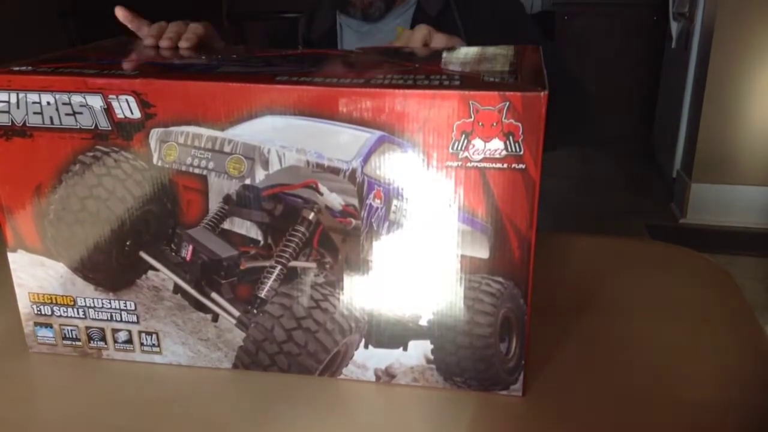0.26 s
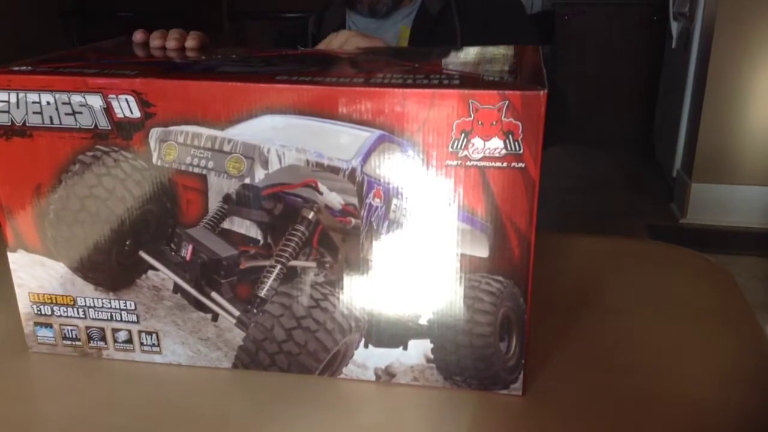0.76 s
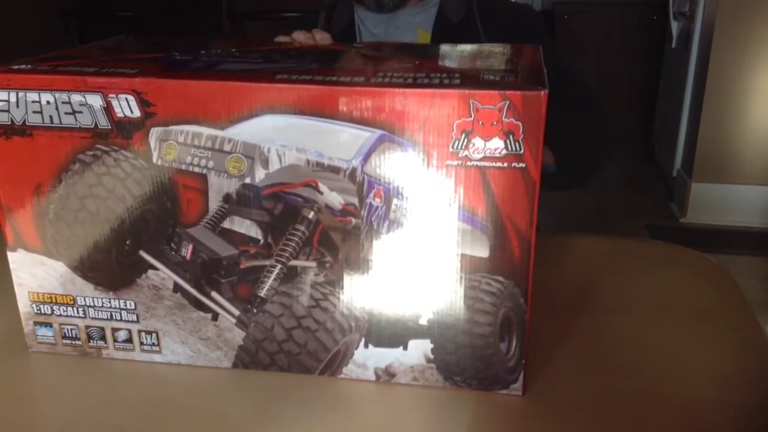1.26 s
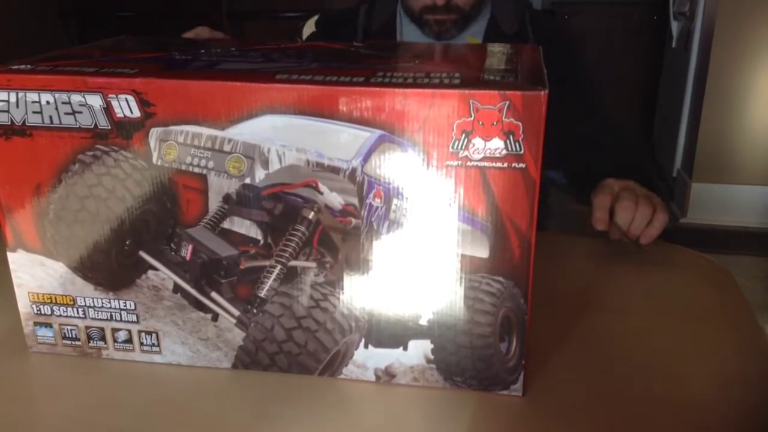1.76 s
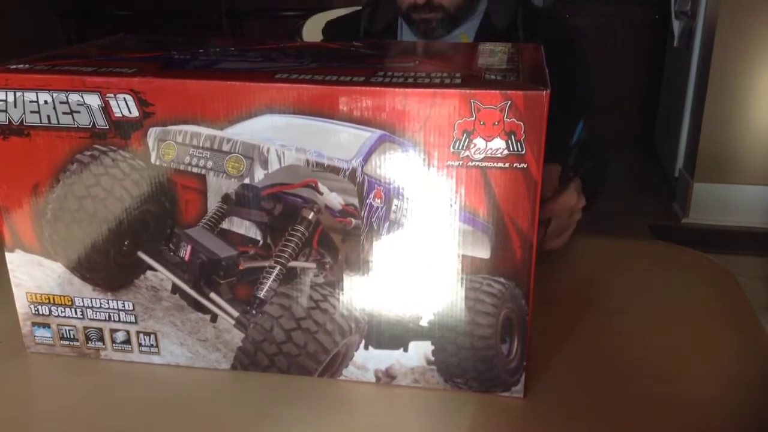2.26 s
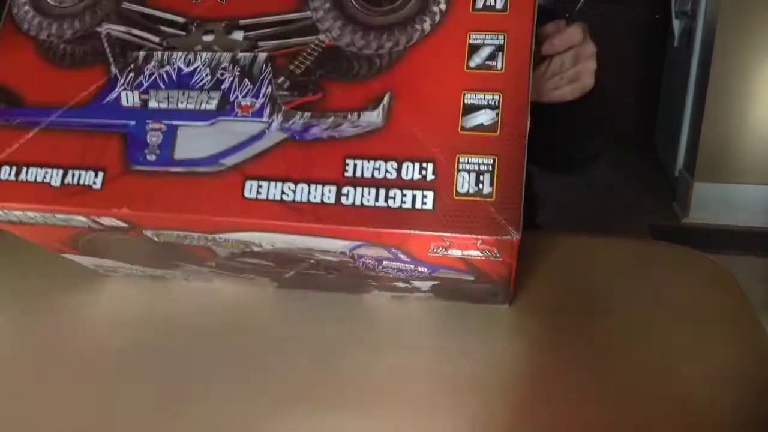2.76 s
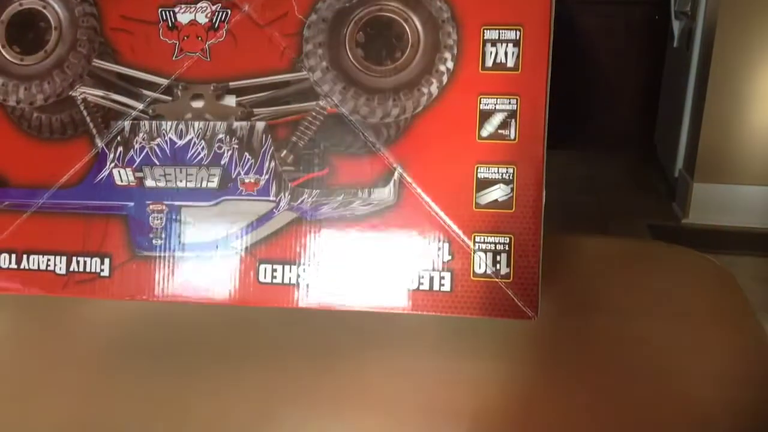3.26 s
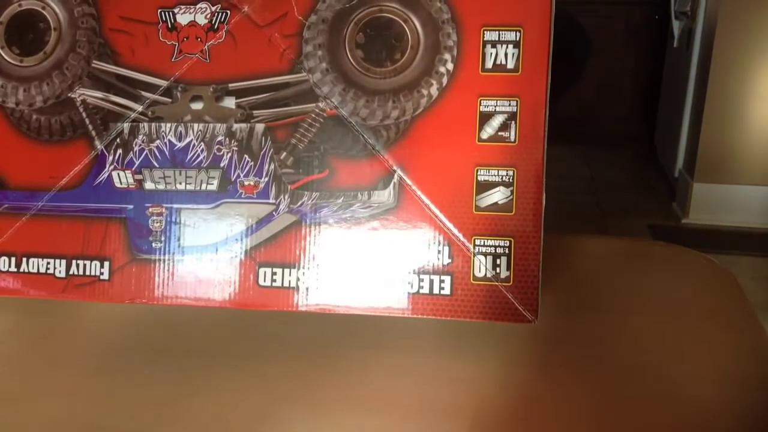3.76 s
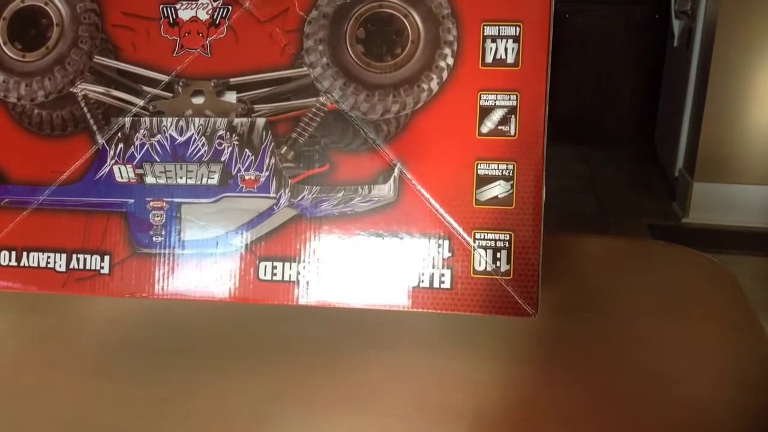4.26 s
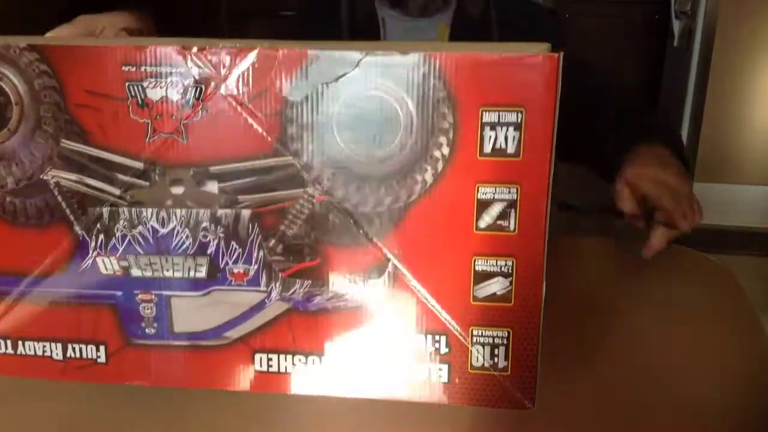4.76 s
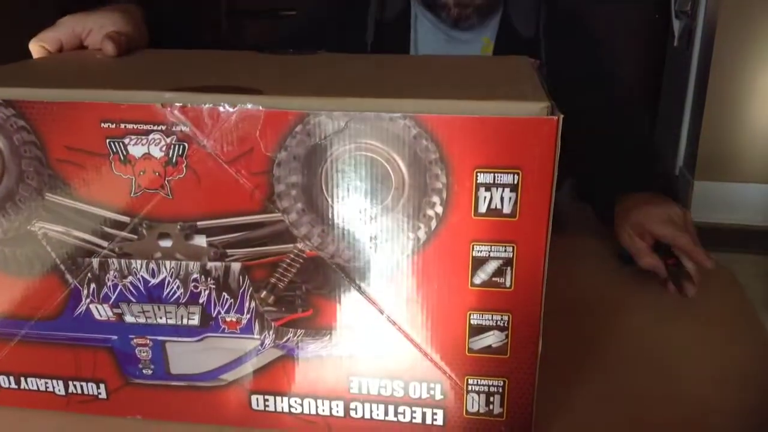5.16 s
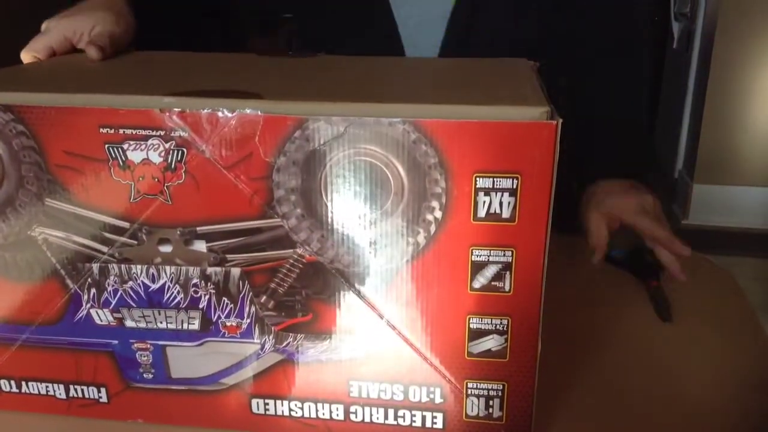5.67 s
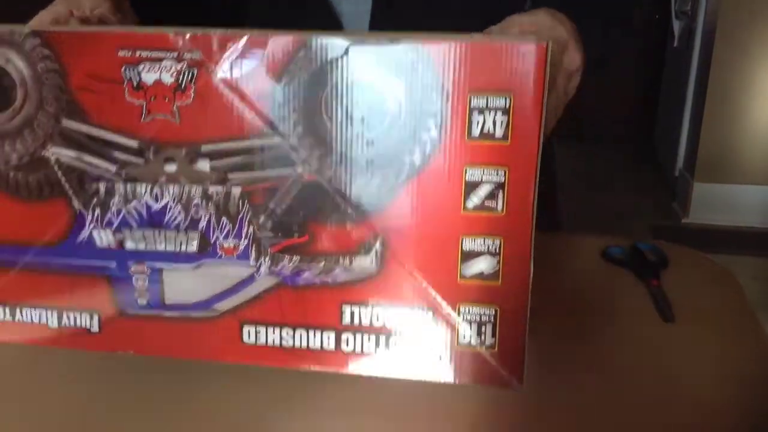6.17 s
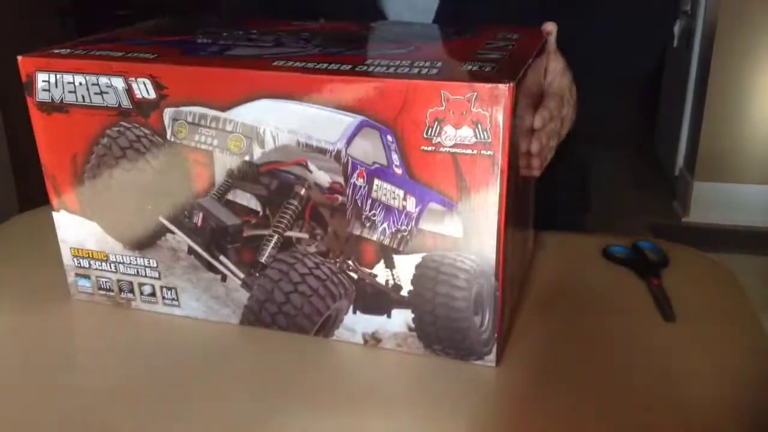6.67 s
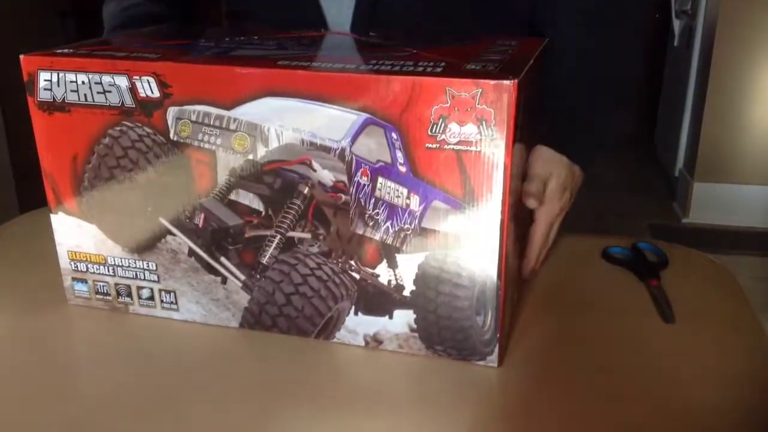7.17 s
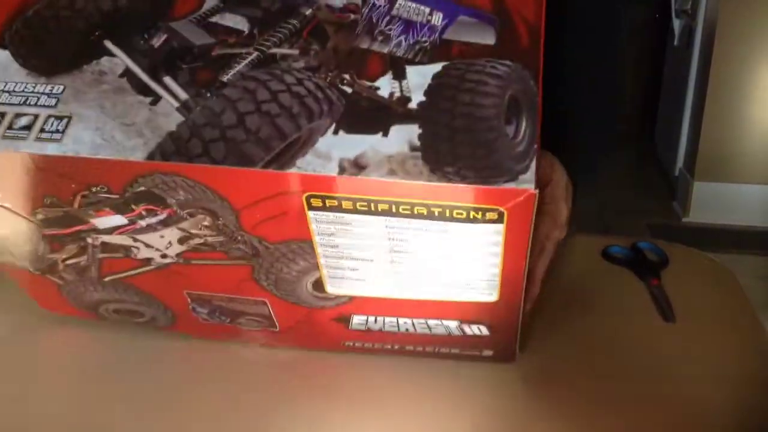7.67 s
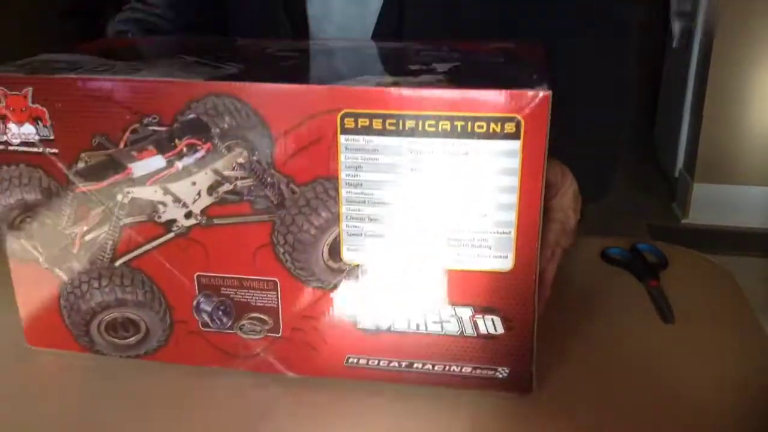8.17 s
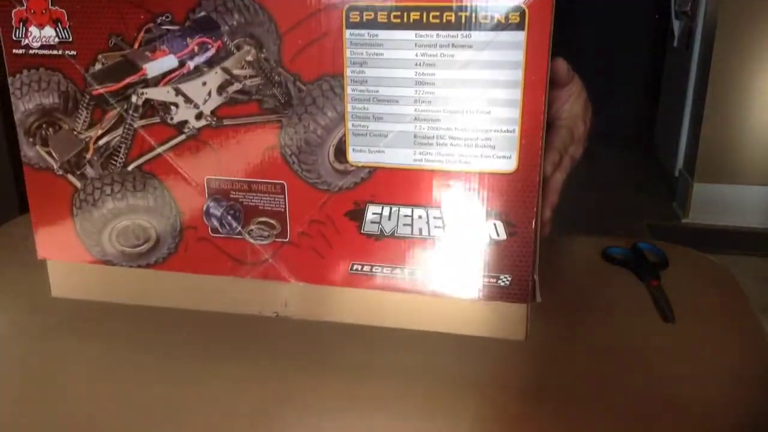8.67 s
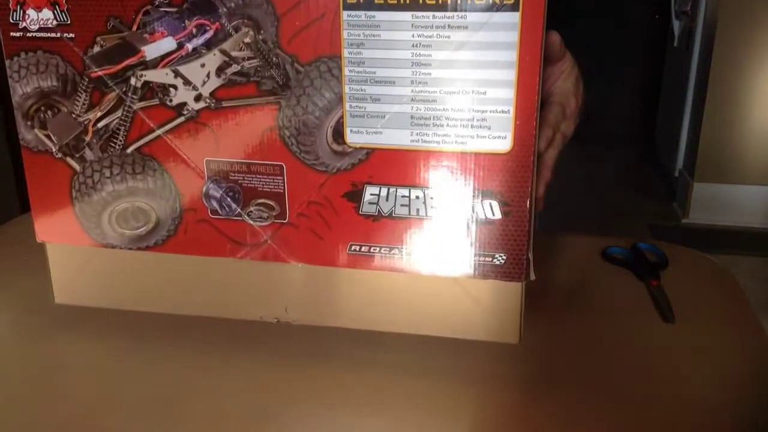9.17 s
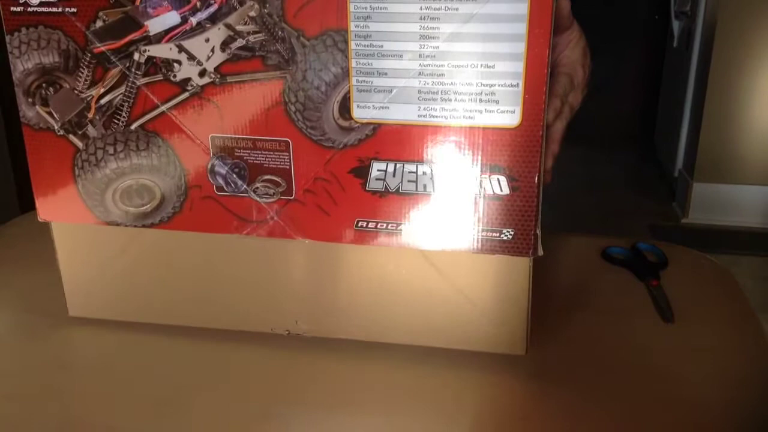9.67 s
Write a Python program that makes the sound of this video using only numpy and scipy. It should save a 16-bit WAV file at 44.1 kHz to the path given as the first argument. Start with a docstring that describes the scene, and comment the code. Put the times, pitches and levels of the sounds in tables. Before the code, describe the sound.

A faint steady hum and hiss lies under everything, in a small hard room, picked up close. From 0 to 2 s hands brush a large cardboard box, with dull light taps, a bright swish at 0.6 and a dry tick. From 2.1 to 4.7 s the box is turned with low rubs and soft hollow bumps, a clearer one near 4.0. At 4.9 a small tool snaps shut, by far sharp and loud; small taps at 5.2 to 5.5 grow into a rapid clatter on wood from 5.6 to 5.9. Thuds at 6.0 and 6.2 begin more tipping, with swishes and knocks until 7.5. Around 7.75 bright crackles burst with a rub, then a firm hollow thump lands at 8.17. From 8.3 to the end the lid drags upward in steady, uneven scraping, catching briefly near 8.6, with a soft bump at 9.8.

```python
"""Over faint hum and hiss, hands slide over a large cardboard box on a wooden table: stick-slip drives its walls.
Midway a small folding tool snaps shut, is shuffled about and dropped; its impacts ring tool and table modes.
Then the box is tipped and set down, its walls ringing at each blow, and its lid is dragged up by friction.
Tape and card edges crackle along the way; a small hard room reflects every blow and crackle."""
import sys
import numpy as np
from scipy import signal
from scipy.fft import rfft, irfft
from scipy.io import wavfile

SR = 44100
rng = np.random.default_rng(int(sys.argv[2]) if len(sys.argv) > 2 else 0)


def wav_out(sig):
    """Save sig, one row per channel (or a flat mono array), as 16-bit PCM at SR to the path in sys.argv[1]."""
    wavfile.write(sys.argv[1], SR, np.round(np.clip(np.atleast_2d(sig).T, -1, 1) * 32767).astype(np.int16))


N = 437472  # samples

# Spectrum of the steady background noise. Each row: frequency in Hz, relative density in dB per Hz.
FLOOR_SPECTRUM = [(24, -58), (40, -28), (75, -47), (104, -31), (124, 2), (140, -4), (226, 1), (467, -4),
                  (2050, -16.5), (9940, -19.5), (10700, -19.5), (16000, -25)]
# Decay of the room. Each row: frequency in Hz, t60 in s.
ROOM_DECAY = [(150, 0.2), (500, 0.41), (1500, 0.46), (4000, 0.46), (9000, 0.39), (15000, 0.34)]
# Dry crackles of tape and card edges. Each row: start in s, peak in dB, pitch in Hz.
TICKS = [(0.15, -43, 2960), (0.555, -43, 3420), (0.5804, -25.5, 3130), (1.368, -45, 3940),
         (1.6472, -31, 11800), (2.275, -42, 1910), (2.486, -39, 2520), (4.2447, -31.5, 2040),
         (4.4197, -44, 2160), (4.659, -41, 2880), (5.16, -47, 12000), (5.1754, -29.5, 8980),
         (5.293, -44, 12100), (6.5382, -33, 3770), (6.813, -40, 2350), (7.393, -44, 2800),
         (7.418, -34, 1820), (7.7388, -27, 3050), (7.762, -19.5, 6030), (7.7748, -24, 5270),
         (7.8232, -30.5, 4200), (7.8564, -33, 7220), (7.7376, -28, 7000), (7.7626, -18, 12000),
         (7.8817, -24, 7450), (8.0235, -30.5, 2960), (8.1038, -32, 2700), (8.2665, -36, 2540)]
# The tool snaps shut. Each row: start in s, peak of the ring in dB, peak of the sharp crack in dB.
SNAPS = [(4.930, -6.5, -18)]
# The tool taps and bounces. Each row: start in s, clack in dB, its pitch in Hz, its focus in dB per octave,
# knock of the table in dB, its pitch in Hz, sharp crack in dB.
KNOCKS = [(5.2039, -26.5, 3610, 6, -31.5, 1600, -52), (5.3646, -36, 3460, 19, -47, 420, -34),
          (5.4938, -26, 3640, 13, -25, 1570, -47), (5.5798, -15.5, 2940, 14, -25, 1450, -26.5),
          (5.602, -20.5, 3360, 23, -28.5, 1310, -37), (5.652, -14.5, 4460, 3, -11, 1450, -17),
          (5.6542, -15, 2900, -6.5, -10, 530, -8), (5.724, -9, 2350, 2, -13, 880, -32),
          (5.7787, -17, 2160, 8, -11, 890, -40), (5.8108, -16, 3350, 5, -17.5, 1760, -35),
          (5.8347, -23, 2700, 13, -21.5, 840, -36), (5.8606, -30, 2200, 3, -21.5, 830, -37)]
# Modes of the free tool. Each row: frequency in Hz, level in dB, t60 in s.
TOOL_MODES = [(505, -8, 0.024), (1026, -3, 0.021), (1507, 1.5, 0.02), (2057, 1, 0.013), (2500, 3, 0.022),
              (2960, 1, 0.015), (3473, 11, 0.0059), (3980, -6, 0.02), (4560, 3, 0.0065), (4910, 1, 0.0086),
              (5460, 1, 0.0065), (6200, -2, 0.0055), (9100, -12, 0.0018)]
# Modes of the table top. Each row: frequency in Hz, level in dB, t60 in s.
TABLE_MODES = [(242, -41, 0.11), (308, -4.5, 0.41), (386, -45, 0.036), (523, 14, 0.04), (583, -1, 0.14),
               (663, 3.5, 0.052), (830, 5.5, 0.028), (932, 14, 0.019), (1398, 17, 0.011),
               (1480, 5.5, 0.035), (1720, 19.5, 0.012), (2233, 18.5, 0.01)]
# Hard edges meeting. Each row: frequency in Hz, relative level in dB.
CRACK_SPECTRUM = [(1000, -11), (3000, 3.5), (8000, -2.5), (12000, -7.5), (16000, -17)]
# Blows on the box. Each row: start in s, peak in dB, pitch of the struck wall in Hz,
# hardness in dB per octave, slap in dB.
THUMPS = [(0.065, -33, 202, 0, -55), (0.333, -36.5, 370, 12, -55), (0.574, -35, 1060, -7, -52),
          (0.748, -33.5, 247, 14.5, -53.5), (1.366, -35.5, 225, 5, -44), (1.747, -34, 245, 2, -53),
          (2.125, -28.5, 245, 3, -41), (2.233, -42, 159, -4, -58), (2.270, -45, 200, 5, -53),
          (2.545, -43, 237, -11, -60), (2.697, -30, 301, 3, -57), (3.016, -32.5, 346, 8, -49),
          (3.674, -35, 360, -1, -53), (3.958, -24, 331, 10, -44), (4.273, -55, 377, 7, -50),
          (4.513, -48, 216, -13, -60), (4.849, -43, 870, 1, -54), (5.983, -23.5, 177, -11.5, -39),
          (6.227, -29, 292, 6, -38), (6.236, -17.5, 312, 7, -29), (6.246, -21.5, 463, -4, -55),
          (6.427, -33, 390, 12, -54), (6.72, -35, 431, 9, -57), (6.779, -28, 1040, -7, -55),
          (6.806, -30, 404, -7, -36.5), (6.876, -36, 148, -22, -60), (6.923, -37.5, 1030, 0, -46),
          (7.035, -37, 129, 7.5, -58), (7.132, -33.5, 430, -10, -58), (7.367, -39, 1030, 5, -43),
          (7.415, -28, 382, 13, -34), (7.689, -33, 250, 5, -55), (7.696, -21.5, 221, 7.5, -48),
          (7.709, -33, 213, 5, -55), (7.753, -26, 156, 7, -47), (8.162, -29, 252, 10, -36),
          (8.169, -15, 222, 0.5, -34), (8.188, -18, 242, 6.5, -38), (8.198, -19.5, 231, 4, -44),
          (8.226, -25, 231, 0, -54), (9.818, -31.5, 178, -1.5, -55)]
# Modes of the box, before any extra damping. Each row: frequency in Hz, level in dB, t60 in s.
BOX_MODES = [(93, -13.5, 0.13), (137, -34, 0.011), (181, -22, 0.034), (198.4, -3, 0.051),
             (236.6, -1, 0.078), (292.6, 0.5, 0.031), (373, 2, 0.034), (454, -0.5, 0.048), (511, 10, 0.017),
             (665, 14.5, 0.01), (876, 6.5, 0.019), (1007, 3.5, 0.037), (1176, -19, 0.08), (1358, -1, 0.021),
             (1880, -28, 0.0057), (2520, 6, 0.011), (3520, -10, 0.0041)]
# Card meeting card or wood. Each row: frequency in Hz, relative level in dB.
SLAP_SPECTRUM = [(400, -6), (1200, 0), (3500, -7), (7000, -16), (16000, -24)]
# Strokes of hands and card. Each row: time of the peak in s, rise in s, fall in s, drone of the box walls in dB,
# its pitch in Hz, slide on the table in dB, scrape of card in dB, swish of skin on the glossy print in dB.
STROKES = [ (.074, 0.092, 0.1, -48, 206, -49.5, -50, -50), (.15, 0.092, 0.13, -49, 230, -55, -52.5, -55.5),
           (.36, 0.17, .2, -50.5, 370, -56, -71, -58), (.49, .25, 0.6, -48.5, 338, -50, -47.5, -54.5),
           (.6, 0.047, 0.075, -45.5, 326, -45, -40.5, -36.5),
           (.794, 0.069, 0.088, -36.5, 276, -43, -44.5, -43),
           (1.058, 0.08, 0.066, -54.5, 246, -74, -58, -53.5), (1.39, 0.073, 0.1, -55, 250, -62, -63, -59),
           (1.46, 0.22, 0.13, -51.5, 266, -55.5, -59, -79), (1.6, 0.19, 0.23, -55.5, 371, -59, -58, -52),
           (1.78, 0.15, 0.12, -47, 295, -50, -48, -40.5), (2.16, 0.042, .2, -46, 267, -55, -56.5, -58.5),
           (2.27, 0.12, 0.1, -43, 210, -59, -58.5, -62), (2.446, 0.17, 0.96, -53, 332, -55, -55, -53),
           (2.684, 0.18, 0.48, -41.5, 302, -52, -52.5, -56.5),
           (2.806, .2, 0.14, -47.5, 257, -52, -54.5, -56), (3.0, 0.06, 0.27, -45.5, 264, -53.5, -56.5, -68),
           (3.122, 0.29, 0.1, -49.5, 260, -52.5, -55, -55.5), (3.224, .1, 0.14, -54, 432, -57.5, -64, -64),
           (3.35, 0.17, 0.9, -63, 240, -75, -70, -73), (3.786, 0.085, 0.11, -49.5, 408, -52, -57, -62),
           (3.835, 0.14, 0.075, -46, 364, -47.5, -55, -54.5), (3.99, 0.29, 0.14, -54, 390, -68, -62, -65),
           (4.13, 0.58, .2, -50.5, 383, -52.5, -66, -66), (4.222, 0.054, 0.13, -48, 407, -43, -52, -61),
           (4.274, 0.048, 0.083, -40, 288, -46.5, -45.5, -42),
           (4.53, 0.84, 0.38, -61, 266, -65, -65.5, -69), (4.662, .06, 0.22, -58, 293, -60, -60.5, -80),
           (4.91, .1, .1, -66, 320, -72, -67, -66), (5.12, 0.29, 0.081, -43, 407, -49, -63, -66),
           (5.18, 0.018, 0.19, -48, 377, -70, -58, -59), (5.299, 0.37, 0.11, -51, 259, -60, -57, -70),
           (5.389, 0.077, 0.14, -48, 248, -48.5, -51.5, -73), (5.93, 0.6, .06, -43, 282, -46.5, -53, -57),
           (6.0, 0.054, 0.11, -40, 220, -46, -50, -49), (6.1, 0.15, .15, -49, 230, -50.5, -50.5, -51),
           (6.2, .1, 0.089, -54, 230, -53, -56, -61), (6.29, 0.061, 0.11, -40, 455, -65, -50.5, -82),
           (6.4, 0.064, 0.25, -62, 424, -67, -54.5, -46), (6.468, .15, 0.26, -39.5, 264, -45.5, -49.5, -47),
           (6.57, .1, 0.12, -39.5, 295, -47, -46, -43), (6.712, 0.036, 0.24, -46, 405, -62, -53, -50.5),
           (6.815, 0.092, .06, -49, 383, -48.5, -52.5, -52), (6.9, 0.2, 0.16, -50, 252, -61, -64, -71),
           (6.984, 0.12, 0.22, -55, 344, -57.5, -59, -58), (7.16, .07, 0.18, -45.5, 205, -58, -56, -58),
           (7.385, 0.24, 0.13, -50.5, 405, -54.5, -58, -67), (7.43, 0.07, 0.065, -61, 320, -54, -50, -45),
           (7.485, 0.089, 0.097, -46, 270, -49, -45.5, -44), (7.536, .15, 0.073, -43.5, 236, -53, -54, -61),
           (7.652, 0.35, 0.13, -50.5, 394, -54, -56.5, -59.5),
           (7.739, 0.019, 0.045, -47, 235, -49, -46, -57), (7.774, 0.046, 0.032, -32, 223, -39, -43.5, -39),
           (7.82, 0.071, 0.3, -46.5, 210, -49.5, -49, -48.5),
           (8.036, 0.22, 0.53, -48.5, 307, -55.5, -49, -50.5), (8.13, .2, 0.12, -65, 234, -59, -48, -73),
           (8.32, 0.15, 0.19, -40, 219, -45, -43.5, -47), (8.55, 0.09, 0.042, -49, 260, -55, -51.5, -56),
           (8.715, .09, 0.094, -47, 240, -49, -48.5, -49.5), (8.86, .1, 0.17, -50, 330, -52, -52, -53.5),
           (8.99, 0.11, 0.13, -51, 260, -49, -52, -54), (9.19, 0.11, .1, -52, 260, -56, -56, -56),
           (9.38, .12, 0.24, -46, 288, -46, -49, -52), (9.6, 0.17, 0.39, -50.5, 241, -47.5, -51, -56),
           (9.75, 0.36, 0.17, -53, 360, -50, -49, -49.5), (9.82, .1, 0.072, -41, 185, -50, -44, -47), ]
# The lid drags up the sides. One row: drone in dB, its pitch in Hz, slide in dB, scrape in dB, swish in dB.
LID = (-50, 285, -51.5, -55.5, -61)
# How hard the lid drags; it sticks once, a brief dip. Each row: time in s, gain on the lid's levels in dB.
LID_DRAG = [(8.2, -29), (8.3, -0.5), (8.58, 1.5), (8.63, -4.5), (8.68, 0.5), (9.0, 1), (9.3, 0.5),
            (9.6, -1), (9.92, 2)]
# Card sliding on the table top. Each row: frequency in Hz, filter gain in dB.
SLIDE_SPECTRUM = [(400, -33), (650, -2.5), (850, 0.5), (1050, -2.5), (1300, -2), (1550, 0.5), (2200, -17),
                  (4000, -55)]
# Scrape of card. Each row: frequency in Hz, relative density in dB per Hz.
SCRAPE_SPECTRUM = [(900, -31), (1700, -4.5), (2200, -5), (3300, -4.5), (4500, -10.5), (6500, -16),
                   (9000, -15), (16000, -78)]
# Swish of skin on the print. Each row: frequency in Hz, relative density in dB per Hz.
SWISH_SPECTRUM = [(3000, -15), (5500, -1), (7500, -3), (9500, -0.5), (13500, -0.5), (15900, -4.5),
                  (16400, -51)]
# Thinner swish of a light palm. Each row: frequency in Hz, relative density in dB per Hz.
GLIDE_SPECTRUM = [(5000, -40), (8500, -7), (10500, 1), (14500, -1.5), (15900, -3), (16400, -40)]

FLOOR_DB, HUM_DB, HUM_HZ = -61, -73.5, 120  # rms levels ahead of the microphone
SLAP_DECAY_S, CRACK_DECAY_S = 0.025, 0.01
SWELL_DB = 20  # a stroke gains this much over its rise and loses it over its fall
SWELL_ROUNDING = 1.11  # above 1 the top of a swell is rounded
GLIDE_START_DB, GLIDE_SPAN_DB = 5, 4  # swish over scrape where gliding starts; further rise until it is full


def gain_of(db):
    """Level law: decibels to an amplitude factor."""
    return 10 ** (np.asarray(db) / 20)


def evened(x):
    """Power normalization: scales to rms 1."""
    return x / np.sqrt(np.mean(x ** 2) + 1e-20)


def peaked(x):
    """Amplitude normalization: scales to peak 1."""
    return x / abs(x).max()


def read(points, hz):
    """Interpolation of a table on a log-frequency axis."""
    f, value = np.transpose(points)
    return np.interp(np.log(hz + 1), np.log(f + 1), value)


def add(mix, s, sound):
    """Superposition: mixes a sound in at time s."""
    part = mix[round(s * SR):][:len(sound)]
    part += sound[:len(part)]


def colour(x, points):
    """Linear filtering by a spectrum, scaled to rms 1."""
    gain = gain_of(read(points, np.fft.rfftfreq(len(x), 1 / SR)))
    return evened(irfft(rfft(x) * gain, len(x)))


def ring(modes, strike_db=0, damping=1, contact_s=0.0006):
    """Modal superposition: dying sines, with an onset softened by the contact time.

    strike_db is how much the struck place favours each mode; damping divides every t60.
    """
    hz, db, t60 = np.transpose(modes)[:, :, None]
    t = np.arange(SR // 8) / SR
    decay = gain_of(db + strike_db - 60 * damping * t / t60)
    modal = decay * np.sin(2 * np.pi * hz * t)
    return modal.sum(0) * (1 - np.exp(-t / contact_s))


def favour(modes, hz, db_per_octave):
    """Modal participation: the struck place rings the modes near hz best."""
    return -db_per_octave * abs(np.log2(np.array(modes)[:, :1] / hz))


def burst(points, decay_s):
    """Broadband impact: a short dying puff of noise with a smooth spectrum, peak 1."""
    t = np.arange(4096) / SR
    z = rfft(rng.standard_normal(len(t)) * gain_of(-60 * t / decay_s))
    spectrum = gain_of(read(points, np.fft.rfftfreq(len(t), 1 / SR)))
    puff = irfft(z / abs(z) * spectrum)  # keeps the phases, smooths the magnitudes
    return peaked(puff * gain_of(-30 * t / decay_s))


def slips(per_s, spread_db):
    """Stick-slip friction: random clicks of random sign; spread_db sets how their sizes scatter."""
    size = gain_of(spread_db * np.minimum(rng.exponential(1, N), 4))
    struck = rng.random(N) < per_s / SR
    return evened(size * struck * rng.choice([-1, 1], N))


def resonate(x, hz, width):
    """Heterodyne resonance: shifts the curve hz down to zero, smooths, and shifts back, gain 1."""
    turn = np.exp(2j * np.pi * np.cumsum(hz) / SR)
    r = np.exp(-np.pi * width / SR)
    return 2 * (turn * signal.lfilter([1 - r], [1, -r], x / turn)).real


def background():
    """Stationary noise: hiss and rumble of fixed spectrum, with a mains hum as one sine."""
    hum = np.sqrt(2) * np.sin(2 * np.pi * HUM_HZ * np.arange(N) / SR)
    noise = colour(rng.standard_normal(N), FLOOR_SPECTRUM)
    return gain_of(FLOOR_DB) * noise + gain_of(HUM_DB) * hum


def room(x):
    """Reverberation: sparse reflections of random sign from 3 ms on, decaying by frequency."""
    taps = np.zeros((3, SR // 2 + 20))
    grid = np.arange(130, SR // 2, 20)
    at = grid + rng.integers(0, 20, (3, len(grid)))
    np.put_along_axis(taps, at, rng.choice([-1., 1.], at.shape), 1)
    hz, t, z = signal.stft(taps, SR, nperseg=256)
    early = 1 + 1.66 * np.exp(-t / 0.026)  # table and near wall answer first and strongest
    decay = gain_of(-60 * t / read(ROOM_DECAY, hz)[:, None])
    tails = signal.istft(z * early * decay, SR, nperseg=256)[1]
    # three tails take turns, 3 rounds a second, so that blows differ
    phase = np.arange(N) / SR * 3 + np.arange(3)[:, None] / 3
    turn = np.sqrt(2 / 3) * np.cos(2 * np.pi * phase)
    return signal.fftconvolve(x * turn, tails / np.linalg.norm(tails[0]), axes=1)[:, :N].sum(0)


def ticks():
    """Strongly damped oscillation: a few cycles at the pitch of each crackle."""
    out, t = np.zeros(N), np.arange(300) / SR
    for s, db, hz in TICKS:
        crackle = np.sin(2 * np.pi * hz * t) * np.exp(-t * hz / 2.4)
        add(out, s, gain_of(db) * peaked(crackle))
    return out


def knocks():
    """Impact of coupled bodies: the snap rings the free tool; taps and bounces clack, knock the table and crack."""
    out = np.zeros(N)
    for s, db, crack_db in SNAPS:
        add(out, s, gain_of(crack_db) * burst(CRACK_SPECTRUM, CRACK_DECAY_S))
        add(out, s, gain_of(db) * peaked(ring(TOOL_MODES, contact_s=0.0004)))
    place = rng.standard_normal((len(KNOCKS), len(TABLE_MODES), 1))
    main_hz = max(TOOL_MODES, key=lambda mode: mode[1])[0]
    for (s, clack_db, hz, focus_db, table_db, table_hz, crack_db), chance in zip(KNOCKS, place):
        held = np.array(TOOL_MODES) * [hz / main_hz, 1, 1]  # each grip shifts the modes
        clack = ring(held, favour(held, hz, focus_db), damping=1.8)  # and damps them
        add(out, s, gain_of(clack_db) * peaked(clack))
        spot_db = favour(TABLE_MODES, table_hz, db_per_octave=11.0) + 2 * chance
        add(out, s, gain_of(table_db) * peaked(ring(TABLE_MODES, spot_db, contact_s=0.00097)))
        add(out, s, gain_of(crack_db) * burst(CRACK_SPECTRUM, CRACK_DECAY_S))
    # a light tool moves no deep bass
    return signal.sosfilt(signal.butter(2, 170, "high", fs=SR, output="sos"), out)


def thumps():
    """Impact excitation: a blow rings the box and slaps its face; softer blows lose the higher modes."""
    out = np.zeros(N)
    place = rng.standard_normal((len(THUMPS), len(BOX_MODES), 1))
    octaves = np.log2(np.array(BOX_MODES)[:, :1] / 300)
    for (s, db, hz, hardness_db, slap_db), chance in zip(THUMPS, place):
        strike_db = hardness_db * octaves + favour(BOX_MODES, hz, db_per_octave=12.0) + 2 * chance
        add(out, s, gain_of(db) * peaked(ring(BOX_MODES, strike_db, contact_s=0.0011)))
        add(out, s, gain_of(slap_db) * burst(SLAP_SPECTRUM, SLAP_DECAY_S))
    return out


def stroke_curves():
    """Addition of powers: strokes and lid drag give the wall pitch in Hz and the gains of four layers."""
    t = np.arange(0, N + 128, 128) / SR
    s, rise, fall, drone_db, hz, *rest_db = np.array(STROKES).T[:, :, None]
    lid_drone_db, lid_hz, *lid_rest_db = LID
    away = np.where(t < s, (s - t) / np.maximum(rise, .01), (t - s) / np.maximum(fall, .01))
    strokes = gain_of(-SWELL_DB * np.minimum(away, 5) ** SWELL_ROUNDING)
    drag = gain_of(np.interp(t, *np.transpose(LID_DRAG), left=-99))
    swell = np.vstack([strokes, drag]) ** 2
    levels = zip([drone_db, *rest_db], [lid_drone_db, *lid_rest_db])
    power = [swell * gain_of(np.vstack([stroke_db, lid_db])) ** 2 for stroke_db, lid_db in levels]
    # the pitch is the mean over strokes and lid, weighted by drone power
    wall_hz = (power[0] * np.vstack([hz, lid_hz])).sum(0) / power[0].sum(0)
    curves = [wall_hz, *np.sqrt(np.sum(power, 1))]
    return [np.interp(np.arange(N) / SR, t, curve) for curve in curves]


def rubbing():
    """Friction-driven vibration: slips drive the box walls and the slide; finer slips make scrape and swish."""
    wall_hz, *gains = stroke_curves()
    walls = signal.oaconvolve(slips(900, spread_db=2.5), ring(BOX_MODES, damping=0.91))[:N]
    walls = evened(resonate(walls, wall_hz, 213))  # the wall under the hand sounds loudest
    slide = signal.oaconvolve(slips(1500, spread_db=-1.0), ring(BOX_MODES, damping=10.7))[:N]
    slide = colour(slide, SLIDE_SPECTRUM)
    scrape = colour(slips(5000, spread_db=-0.5), SCRAPE_SPECTRUM)
    swish = colour(slips(12000, spread_db=3.0), SWISH_SPECTRUM)
    glide = colour(slips(15000, spread_db=1.0), GLIDE_SPECTRUM)
    swish_over_scrape_db = 20 * np.log10(gains[3] / gains[2])
    light = np.clip((swish_over_scrape_db - GLIDE_START_DB) / GLIDE_SPAN_DB, 0, 1)
    swish = np.sqrt(1 - light) * swish + np.sqrt(light) * glide
    return sum(g * layer for g, layer in zip(gains, [walls, slide, scrape, swish]))


def scene():
    """Superposition: blows and crackles sound direct and through the room; rubbing and background only direct."""
    box, tool, crackle = thumps(), knocks(), ticks()
    wet = room(gain_of(3) * box + gain_of(6) * tool + gain_of(-2.0) * crackle)
    return (box + tool + crackle + wet + rubbing() + background())[None]


def record(dry):
    """Band limitation: the microphone drops the deep bass; a steep low-pass ends the treble."""
    thin = signal.sosfilt(signal.butter(5, 118, "high", fs=SR, output="sos"), dry)
    low_pass = signal.firwin(511, 15850, window=("kaiser", 9), fs=SR)  # cutoff in Hz
    return signal.oaconvolve(thin, low_pass[None], "same")


dry = scene()
out = record(dry)
wav_out(out)
```